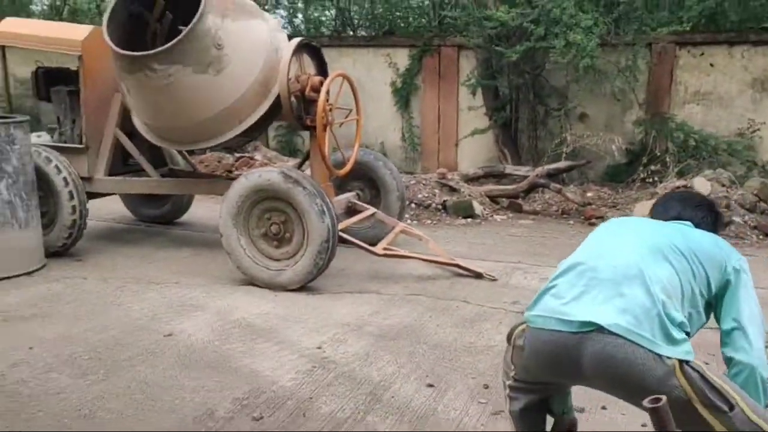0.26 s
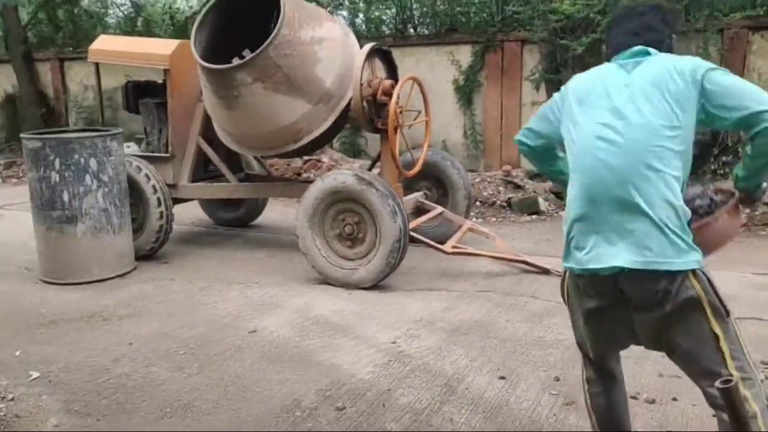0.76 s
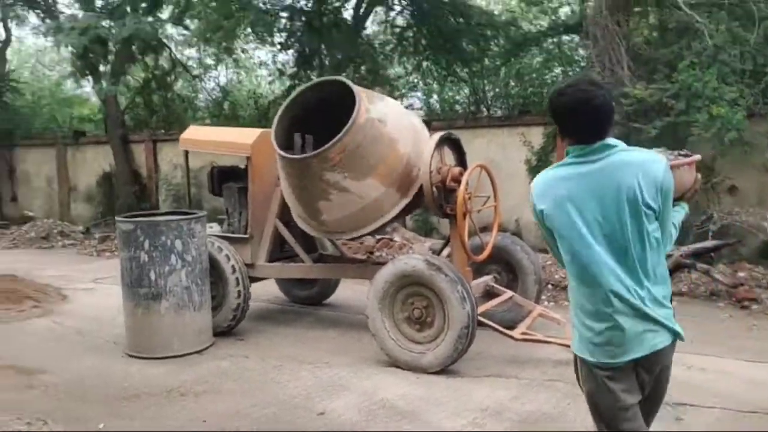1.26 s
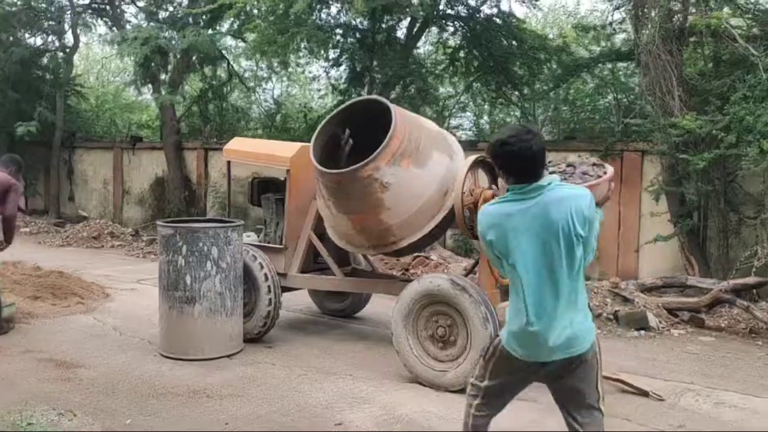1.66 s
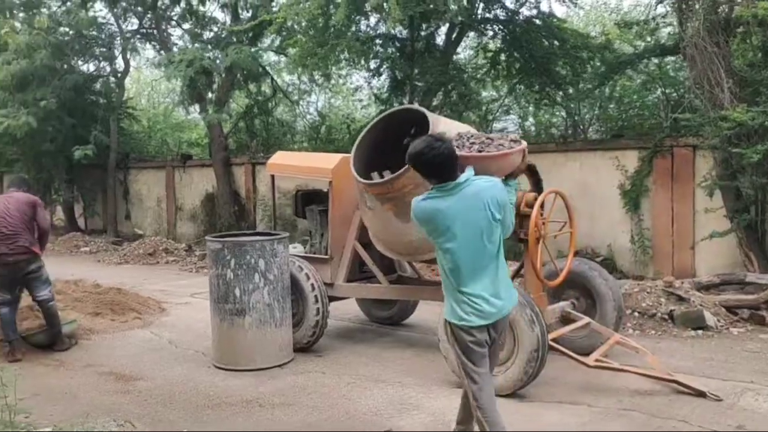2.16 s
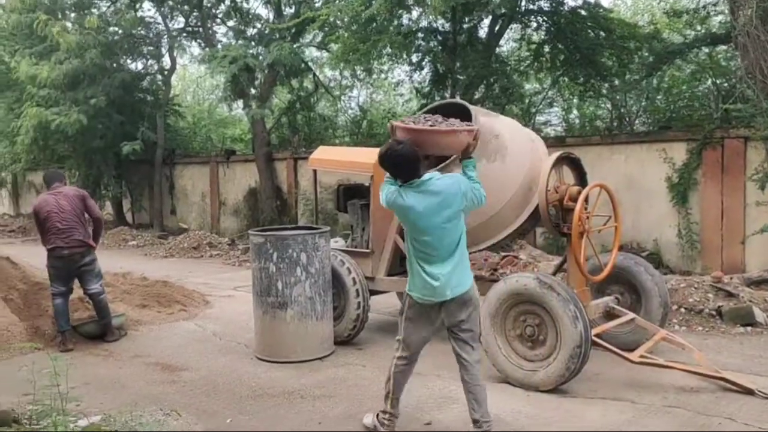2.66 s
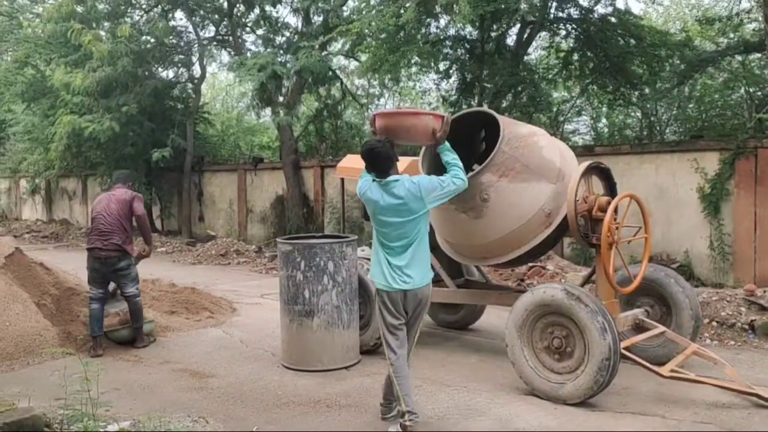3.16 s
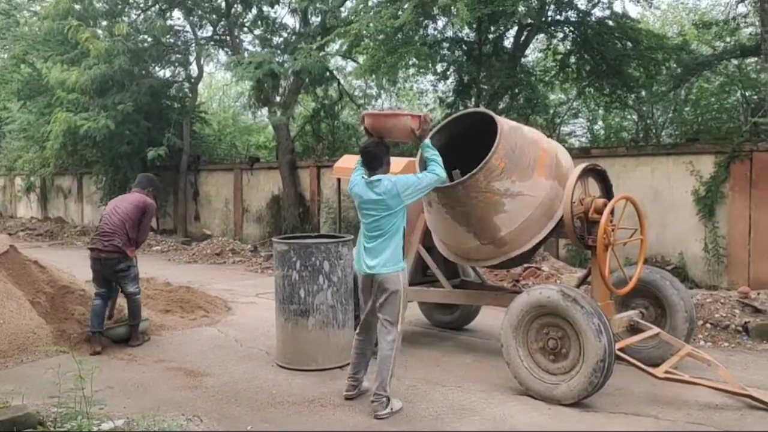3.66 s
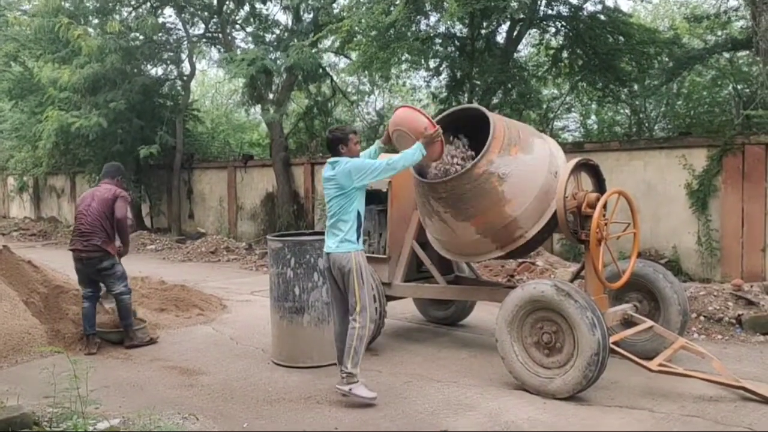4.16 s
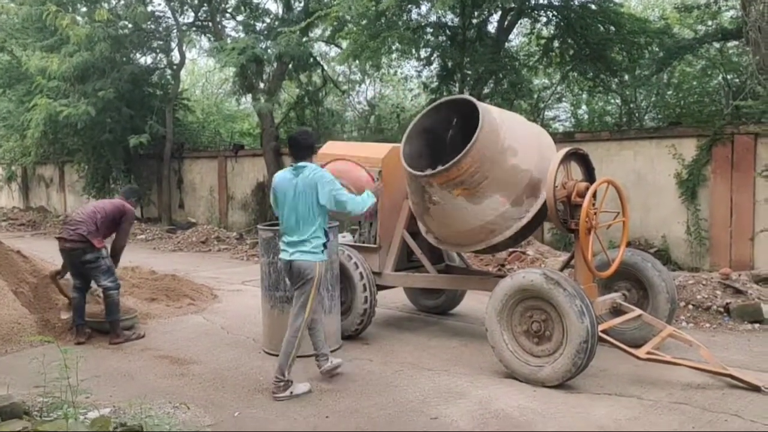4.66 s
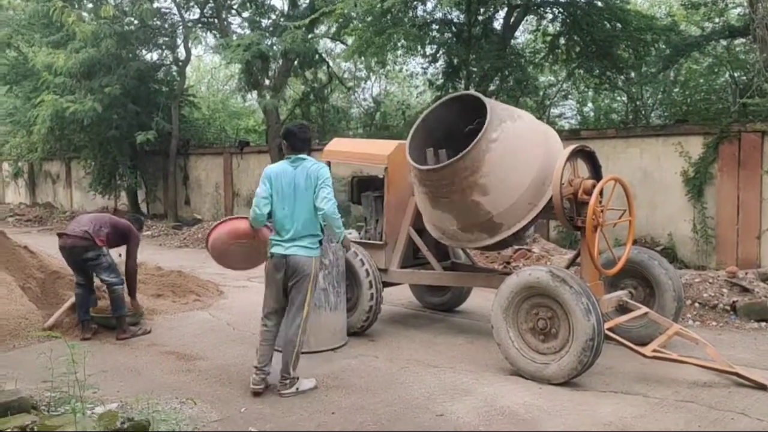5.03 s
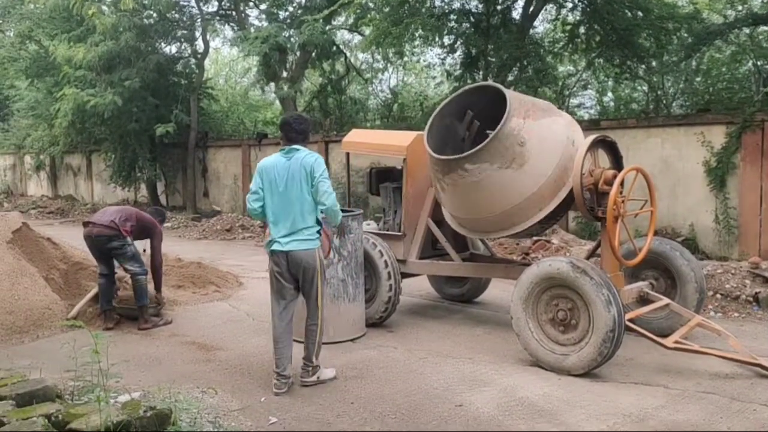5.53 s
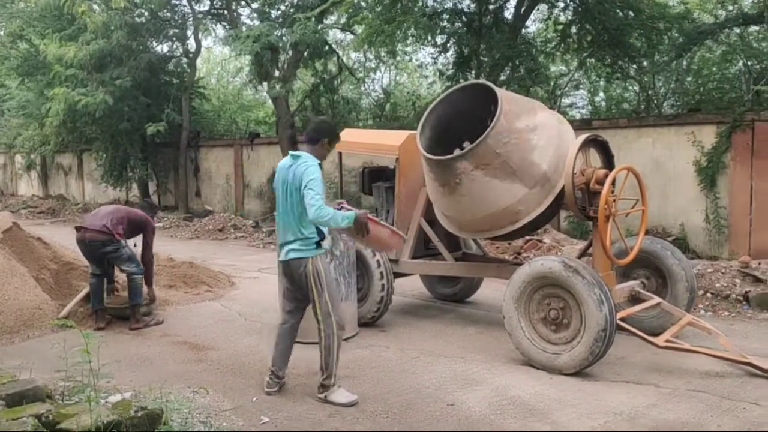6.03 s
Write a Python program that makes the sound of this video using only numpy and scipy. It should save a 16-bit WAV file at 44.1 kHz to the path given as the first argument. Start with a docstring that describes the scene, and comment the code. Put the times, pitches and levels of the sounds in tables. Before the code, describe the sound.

A small diesel thumps steadily while gravel tumbles and scrapes in a metal mixer drum, swelling into a sharp rush as more stones pour in.

```python
"""Stones are heard first, rattling over the beat of a single-cylinder diesel that turns a concrete mixer.
Firings drive silencer and pipe resonances; stones excite mode clusters of the steel shell and tick together.
Falling heaps are bursts of ticks, scrapes are gliding notes, and a tipped pan of gravel swells the rattle.
A walled yard adds diffuse noise. The sound reaches the two ports of a hand-held phone some metres away,
which turns the bass down under loud rattle."""
import sys
import numpy as np
from scipy import signal
from scipy.fft import rfft, irfft, next_fast_len
from scipy.io import wavfile
from scipy.ndimage import uniform_filter1d

SR = 44100
rng = np.random.default_rng(int(sys.argv[2]) if len(sys.argv) > 2 else 0)


def wav_record(signal):
    """Record a signal, one row per channel, as 16-bit PCM in the file named by sys.argv[1]."""
    frames = np.transpose(np.atleast_2d(signal))
    bounded = np.clip(frames, -1, 1)
    # unit amplitude maps onto the largest positive 16-bit level
    quanta = np.round(bounded * 32767).astype(np.int16)
    wavfile.write(sys.argv[1], SR, quanta)


N = 277374

DRUM_LAG, CONE_LAG, ENGINE_LAG = 18, 7, 2  # delay of the left port [samples]


def amp(db):
    """Level definition: decibels to amplitude ratio."""
    return 10 ** (np.asarray(db) / 20)


def unit(x):
    """Normalisation: scale to an rms of 1."""
    return x / np.sqrt(np.mean(x ** 2))


def columns(table):
    """Linear interpolation: every column of a time table at each sample."""
    s, *cols = np.transpose(table)
    time = np.arange(N) / SR
    return [np.interp(time, s, col) for col in cols]


def ring(x, hz, width_hz):
    """Simple resonance: one damped mode of the given bandwidth."""
    return signal.lfilter(*signal.iirpeak(hz, hz / width_hz, fs=SR), x)


def colour(x, points):
    """Spectral filtering: a gain curve through (frequency [Hz], gain [dB]) on a log-frequency axis."""
    size = next_fast_len(N)
    hz, db = np.transpose(points)
    bins_hz = np.fft.rfftfreq(size, 1 / SR)
    gain = amp(np.interp(np.log(bins_hz + 1), np.log(hz), db))
    return irfft(rfft(x, size) * gain, size)[..., :N]


def walk(rate):
    """Band-limited fluctuation: random levels held for 1 / rate seconds, then smoothed twice."""
    hold = int(SR / rate)
    steps = np.repeat(rng.standard_normal(N // hold + 1), hold)
    return uniform_filter1d(uniform_filter1d(steps, hold), hold)[:N]


def waver(rate, share=0.86):
    """Amplitude modulation: a gain that wanders by a few dB."""
    return amp(share * 2.5 * walk(rate))


def drift(hz):
    """Frequency modulation: a centre that wanders by about two per cent."""
    return hz * (1 + 0.019 * walk(8))


def clicks(rate, spread_db):
    """Shot noise: impacts at random moments, with a few hard ones among them."""
    hit = rng.random(N) < rate / SR
    sign = rng.choice([-1, 1], N)
    hardness = rng.exponential(size=N).clip(0, 3.5)
    return unit(hit * sign * amp(spread_db * hardness))


def place(make, lag, direct):
    """Interaural coherence: direct power arrives late at the left port, wall scatter is uncorrelated."""
    direct = np.clip(direct, 0, 1)
    near = make()
    pair = np.array([np.roll(near, lag), near])
    scatter = np.array([make(), make()])
    return np.sqrt(direct) * pair + np.sqrt(1 - direct) * scatter


def facing(hz, centre_hz, octaves, skirt):
    """Modal weighting: most near the centre, a little of every mode, with total power 1."""
    distance = np.log2(np.reshape(hz, (-1, 1)) / centre_hz) / octaves
    share = np.exp(-distance ** 2 / 2) + skirt
    return share / np.sqrt(np.sum(share ** 2, axis=0))


def patch(band, centre_hz, skirt, count, rate):
    """Modal superposition: stone hits excite a cluster of close modes whose gains flicker."""
    lo, hi, t60, octaves = band
    hz = lo * (hi / lo) ** ((np.arange(count) + rng.random(count)) / count)
    flicker = amp(3.7 * np.array([walk(11) for _ in hz]))
    swell = facing(hz, centre_hz, octaves, skirt) * flicker
    width_hz = np.log(1000) / np.pi / t60

    def make():
        """Impulse excitation: a fresh run of hits through the same modes, alternating in sign."""
        hits = clicks(rate, 2.73)
        return unit(sum((-1) ** k * gain * ring(hits, f, width_hz)
                        for k, (f, gain) in enumerate(zip(hz, swell))))
    return make


# Spectrum of the yard's diffuse field: (frequency [Hz], relative gain [dB])
YARD_COLOUR = [(18, -69), (30, -30), (237, 15.5), (691, -2), (1080, 13.5), (1360, 2.5), (2620, 1),
               (3780, -26), (6890, 0.5), (11300, -84), (15500, -54)]


def yard():
    """Diffuse field: steady coloured noise stands for the roar coming back off walls and ground."""
    mid, side = colour(rng.standard_normal((2, N)), YARD_COLOUR)
    # the ports hear the same bass
    side = signal.sosfilt(signal.butter(2, 500, "high", fs=SR, output="sos"), side)
    return amp(-46) * unit(np.array([mid + side, mid - side]))


PIPE_HZ, PIPE_WIDTH_HZ, PIPE_SCATTER = 342, 25.3, 0.0119  # scatter is a share of the frequency


def exhaust(firing):
    """Pipe resonance: each puff swells and fades at a wandering pitch, with gas noise around it."""
    pole = np.exp(-np.pi * PIPE_WIDTH_HZ / SR)
    envelope = unit(firing) + .4 * (rng.standard_normal(N) + 1j * rng.standard_normal(N))
    for _ in range(3):
        envelope = signal.lfilter([1], [1, -pole], envelope)
    pitch_hz = PIPE_HZ * (1 + PIPE_SCATTER * walk(9))
    note = unit(np.real(envelope * np.exp(2j * np.pi * np.cumsum(pitch_hz) / SR)))
    gas_noise = ring(ring(rng.standard_normal(N), 361, 97), 361, 97)
    roar = (.4 + unit(np.abs(envelope))) * gas_noise
    return note + amp(-9) * unit(roar)


FIRE_HZ, FIRST_FIRE_S = 9.427, .002
# lowest [Hz], highest [Hz], t60 [s], breadth of the sounding part [octaves]
CLATTER = (390, 740, .08, .3)
# Mean levels of the engine's parts before they waver: (time [s], silencer thump [dB], pipe ring [dB],
# frame throb [dB], clatter [dB], clatter centre [Hz])
ENGINE_LEVELS = [(0.0, -29.5, -49, -69, -35, 543), (0.07, -47.5, -50, -54, -46, 542),
                 (0.23, -41.5, -35, -71, -44.5, 416), (0.4, -43.5, -52, -55, -41.5, 436),
                 (0.59, -36, -49.5, -69, -39.5, 470), (0.81, -51, -50.5, -69, -50, 450),
                 (0.84, -36.5, -40.5, -63, -44.5, 500), (1.07, -45.5, -50.5, -68, -42, 645),
                 (1.21, -34, -46, -61, -42, 756), (1.94, -44.5, -38.5, -62, -43.5, 483),
                 (2.07, -52, -61, -65, -51, 586), (2.12, -46.5, -43, -77, -48.5, 421),
                 (2.33, -43.5, -47, -59, -39.5, 584), (2.43, -44, -33.5, -63, -39, 446),
                 (2.64, -40.5, -41, -62, -45, 433), (2.95, -44.5, -39.5, -64, -51, 416),
                 (3.1, -46.5, -46, -61, -47, 420), (3.27, -41.5, -35, -60, -49, 407),
                 (3.4, -51, -42, -66, -58, 402), (3.55, -49, -48, -69, -49, 500),
                 (3.64, -38, -39, -65, -38.5, 423), (3.82, -41, -32, -56, -45, 422),
                 (3.93, -37.5, -38, -61, -43.5, 415), (4.12, -37, -40.5, -60, -38, 407),
                 (4.15, -46, -32.5, -71, -43, 410), (4.34, -54, -57, -65, -56, 620),
                 (4.48, -52, -52, -73, -63, 450), (4.8, -45.5, -41.5, -62, -45.5, 423),
                 (4.9, -37, -34.5, -55, -45, 407), (5.01, -32.5, -34, -51, -42.5, 407),
                 (5.09, -37, -41.5, -57, -39, 465), (5.25, -36.5, -37.5, -53, -44.5, 417),
                 (5.5, -45, -37, -52, -47.5, 365), (5.88, -42, -41.5, -62, -50.5, 390),
                 (6.22, -39, -48.5, -59, -40, 513), (6.29, -32, -28, -54, -44, 437)]
# Silencer chambers, ringing in turn: (frequency [Hz], width of the first pass [Hz], relative level [dB],
# delay [s])
SILENCER_MODES = [(166, 20, -3.5, 0.01023), (179.1, 11.6, 5.5, .045), (213.1, 13.3, 0.5, 0.081),
                  (243.2, 18.3, -2, 0.00097), (267.3, 19.7, 0, .03), (297.3, 30, 0, 0.032)]
# Frame resonances: (frequency [Hz], width of each of two passes [Hz], relative level [dB])
FRAME_MODES = [(105, 75, -0.5), (151, 41, 1.5)]
# Where the silencer sounds most, before drift: (time [s], centre frequency [Hz])
THUMP_CENTRE = [(0, 197), (1.5, 248.5), (3, 264), (4.8, 253), (5.2, 219), (6.29, 250)]


def engine():
    """Periodic excitation: firings, with weaker compression strokes between, drive damped resonators."""
    thump_db, pipe_db, frame_db, clatter_db, clatter_hz = columns(ENGINE_LEVELS)
    thump_hz = drift(columns(THUMP_CENTRE)[0])
    turns = np.arange(int(2 * FIRE_HZ * N / SR))
    chance = rng.standard_normal((len(turns), 2))
    jitter_s = 0.00046 * chance[:, 0].clip(-2, 2)
    at = ((FIRST_FIRE_S + turns / (2 * FIRE_HZ) + jitter_s) * SR).astype(int).clip(0)
    firing, strokes = np.zeros(N), np.zeros(N)
    firing[at[::2]] = amp(1.5 * chance[::2, 1])
    strokes[at] = amp(0.78 * chance[:, 1] - 8.1 * (turns % 2))
    gas = unit(strokes) + .7 * rng.standard_normal(N)  # turbulent flow blurs the lines

    frame = sum(amp(db) * ring(ring(gas, f, w), f, w) for f, w, db in FRAME_MODES)
    shares = facing([f for f, *_ in SILENCER_MODES], thump_hz, 0.17, 0.24)
    thump = np.zeros(N)
    for k, (f, w, db, late) in enumerate(SILENCER_MODES):
        chamber = ring(ring(np.roll(gas, int(late * SR)), f, w), f, 1.8 * w)
        thump += (-1) ** k * amp(db) * shares[k] * chamber
    pipe = exhaust(np.roll(firing, -int(0.011 * SR)))

    mono = unit(frame) * amp(frame_db) * waver(16)
    mono += unit(thump) * amp(thump_db) * waver(14)
    mono += unit(pipe) * amp(pipe_db) * waver(11)
    clatter = place(patch(CLATTER, clatter_hz, 0.82, count=14, rate=500), ENGINE_LAG, 0.65)
    clatter = clatter * amp(clatter_db) * waver(10)
    echo = amp(-18.5) * np.roll(mono, int(0.056 * SR))  # off a side wall, in opposite phase at the ports
    return np.array([np.roll(mono, ENGINE_LAG) + echo, mono - echo]) + clatter


# Dull knocks on the frame: (time [s], level before the envelope [dB], fade time constant [s])
FRAME_KNOCKS = [(1.071, -27.5, 0.036), (1.098, -26, 0.019), (2.32, -31.5, 0.028), (3.599, -28, 0.018),
                (5.129, -34, 0.032)]


def knocks():
    """Damped impact: short dull blows with a broad spectrum and exponential decay."""
    shape = np.zeros(N)
    t = np.arange(SR // 8) / SR
    for s, db, fade in FRAME_KNOCKS:
        start = int(s * SR)
        shape[start:start + len(t)] += amp(db) * (1 - np.exp(-t / 0.0024)) * np.exp(-t / fade)
    body_colour = [(150, -27), (300, 10.5), (600, 11.5), (1300, 13.0), (2500, -52)]
    body = lambda: unit(colour(clicks(2200, 0.93), body_colour))
    return shape * place(body, ENGINE_LAG, 0.86)


# Mode clusters: lowest [Hz], highest [Hz], t60 [s], breadth of the sounding part [octaves]
BELLY, CONE = (720, 940, .1, .1), (960, 1290, .11, .06)
RIM, BLADES = (1470, 2050, .065, .12), (2080, 3400, .06, .12)
SHELL_WAVER = 0.69
# Shell regions that stones roll on, mean levels before they waver: (time [s], belly [dB], cone [dB],
# cone centre [Hz], rim [dB], rim centre [Hz], blades [dB], blades centre [Hz])
SHELL_LEVELS = [(0.0, -68, -35.5, 1060, -56, 1820, -50, 2630),
                (0.12, -46, -43, 1026, -50, 1550, -39.5, 2380),
                (0.19, -45, -34.5, 1110, -55, 1800, -37.5, 2410),
                (0.37, -48, -39, 1024, -47, 1680, -43, 2650), (0.46, -54, -34, 996, -53, 1940, -43, 2500),
                (0.56, -43.5, -47, 1100, -46, 1840, -50.5, 2620),
                (0.73, -54.5, -34.5, 1090, -45, 1800, -37, 2570),
                (0.88, -37.5, -34, 1090, -41, 1670, -40.5, 3000),
                (0.95, -45.5, -31.5, 1110, -42, 1720, -39, 2850),
                (1.14, -38.5, -37.5, 1110, -34.5, 1700, -38.5, 2720),
                (1.26, -41, -36.5, 1060, -40, 1620, -37.5, 2880),
                (1.35, -39, -32.5, 1030, -43, 1640, -46, 2800),
                (1.38, -38, -33, 1060, -38.5, 1960, -42, 2760),
                (1.47, -33, -35, 1010, -35, 1970, -34, 2760),
                (1.54, -35.5, -37.5, 1110, -37, 1520, -36.5, 2790),
                (1.61, -42, -35, 990, -36, 1690, -34.5, 3000),
                (1.7, -42, -34, 1070, -32.5, 1610, -37, 2740),
                (1.75, -40.5, -42, 1150, -39, 1860, -33.5, 2620),
                (1.87, -44, -34, 1080, -38.5, 1590, -35.5, 2800),
                (1.98, -51, -31, 1070, -45, 1860, -40.5, 2730),
                (2.01, -49.5, -42, 1110, -39, 1860, -29, 2620),
                (2.17, -41, -44, 1030, -40.5, 1950, -37.5, 2800),
                (2.31, -38, -35.5, 1080, -40, 2000, -36.5, 2080),
                (2.38, -45, -43, 1160, -35.5, 1950, -34, 2000),
                (2.5, -39.5, -44, 1010, -40, 1910, -40.5, 2130),
                (2.57, -41, -44, 1160, -37, 1790, -41, 2920),
                (2.64, -41.5, -34.5, 1016, -36, 1660, -36.5, 2400),
                (3.19, -42.5, -38, 1036, -50.5, 1860, -39.5, 2190),
                (3.43, -49, -33.5, 1146, -25.5, 1770, -29.5, 2400),
                (3.47, -46, -30, 1070, -32, 1890, -32, 2150),
                (3.54, -44, -36, 1100, -31.5, 1880, -38.5, 2750),
                (3.68, -34, -31.5, 1100, -31.5, 1930, -36, 2160),
                (3.75, -47, -34, 1110, -26, 1760, -41, 2330),
                (3.82, -54, -33, 1124, -35.5, 1810, -43, 2900),
                (3.92, -35, -36.5, 1140, -36, 1750, -34.5, 2710),
                (4.06, -42, -48, 1000, -38.5, 1800, -34, 2335), (4.1, -36, -43, 1070, -29, 1740, -41, 2620),
                (4.13, -47, -35, 1090, -32, 1730, -32.5, 2480),
                (4.22, -33, -34.5, 1110, -28.5, 1800, -31.5, 2420),
                (4.31, -34.5, -65, 1020, -33.5, 1730, -37, 2680),
                (4.34, -43, -28, 1046, -34, 1780, -34, 2720), (4.4, -54, -32, 1110, -29.5, 1830, -27, 2510),
                (4.57, -49.5, -58, 1110, -37, 1730, -42, 2480),
                (4.64, -43, -42, 1210, -46, 1870, -42, 2390),
                (4.68, -45.5, -49, 1100, -43.5, 1930, -41, 2740),
                (4.84, -42.5, -41.5, 1080, -39, 1700, -43, 2510),
                (4.99, -37.5, -36.5, 1130, -38, 2020, -36.5, 2680),
                (5.04, -43, -47, 1060, -41, 1850, -40.5, 2700),
                (5.11, -35.5, -34, 1144, -34.5, 1920, -33, 2600),
                (5.36, -43, -33.5, 1085, -34.5, 1710, -36, 2370),
                (5.46, -42, -35.5, 1180, -34, 1910, -29.5, 2330),
                (5.53, -46, -33, 1060, -36, 1870, -37.5, 2160),
                (5.59, -44, -47, 1060, -40, 1810, -32.5, 2230),
                (5.78, -48.5, -37, 1120, -37.5, 1850, -37, 2470),
                (6.15, -42, -37, 1054, -37.5, 1680, -38.5, 2400),
                (6.29, -38, -38, 1140, -38, 1680, -39, 2730)]


def drum():
    """Shell vibration: rolling stones excite four regions of the steel, each a cluster of modes."""
    belly_db, cone_db, cone_hz, rim_db, rim_hz, blades_db, blades_hz = columns(SHELL_LEVELS)
    belly = place(patch(BELLY, drift(842), 0.16, count=8, rate=900), ENGINE_LAG, 0.75)
    cone = place(patch(CONE, cone_hz, 0.33, count=14, rate=1300), CONE_LAG, 1.0)
    rim = place(patch(RIM, rim_hz, 0.89, count=14, rate=900), DRUM_LAG, 0.15)
    blades = place(patch(BLADES, blades_hz, 0.46, count=20, rate=700), DRUM_LAG, 0.74)
    return (belly * amp(belly_db) * waver(20, SHELL_WAVER)
            + cone * amp(cone_db) * waver(16, SHELL_WAVER)
            + rim * amp(rim_db) * waver(16, SHELL_WAVER)
            + blades * amp(blades_db) * waver(16, SHELL_WAVER))


# Stones dragging along the shell: (time [s], length [s], start pitch [Hz], end pitch [Hz],
# amplitude before roughness [dB])
DRAGS = [(.075, .055, 2330, 2260, -37), (.113, .04, 2560, 2470, -46), (.13, 0.035, 2385, 2280, -34),
         (.178, .035, 2250, 2380, -37), (.222, 0.043, 2480, 2520, -36.5), (.28, 0.091, 2480, 2630, -45),
         (.41, 0.039, 2550, 2610, -37.5), (.17, 0.16, 1120, 1097, -38), (.68, 0.11, 2600, 2470, -45),
         (.7, 0.096, 1132, 1080, -40), (.84, 0.18, 1084, 1127, -39), (1.521, 0.18, 1020, 1054, -37.5),
         (1.84, 0.136, 1090, 1054, -39.5), (1.215, 0.12, 2690, 2810, -38), (1.75, 0.039, 2510, 2480, -34),
         (2.02, 0.04, 2430, 2430, -29), (2.619, 0.12, 1050, 1070, -40), (2.759, 0.116, 1067, 1053, -40.5),
         (3.23, .05, 1050, 1050, -31), (3.3, .06, 1050, 1080, -31), (3.42, .13, 1075, 1090, -29.5),
         (3.62, .1, 2150, 2130, -34), (3.69, .1, 1780, 1700, -36), (3.41, .04, 2720, 2700, -33),
         (3.76, 0.054, 1950, 1990, -37), (3.77, .15, 1160, 1130, -38), (3.525, 0.12, 2750, 2850, -38),
         (3.72, .18, 2800, 2865, -40.5), (1.0, .13, 3550, 3620, -43), (1.37, .11, 1993, 2040, -40),
         (4.26, 0.068, 799, 870, -38.5), (4.34, .11, 980, 1123, -38), (4.93, .12, 2596, 2640, -41),
         (5.08, 0.14, 2605, 2556, -40), (5.44, 0.072, 2200, 2176, -34)]


def scrapes():
    """Friction-driven vibration: each drag is a narrow gliding note, roughened in amplitude and phase."""
    out = np.zeros((2, N))
    rough = unit(signal.lfilter(*signal.butter(2, 44, fs=SR), clicks(700, 2.6)))  # below about 44 Hz
    for s, length, from_hz, to_hz, db in DRAGS:
        t = np.arange(int(length * SR)) / SR
        span = slice(int(s * SR), int(s * SR) + len(t))
        edge = np.clip(np.minimum(t, length - t) / 0.011, 0, 1)
        phase = 2 * np.pi * (from_hz + (to_hz - from_hz) * t / length / 2) * t
        note = amp(db) * edge * (1 + .5 * rough[span]) * np.sin(phase + .6 * rough[span])
        lag = CONE_LAG if from_hz < CONE[1] else DRUM_LAG
        out[0, span.start + lag:span.stop + lag] += note
        out[1, span] += note
    return out


TIPPED_S, POUR_PEAK_S, POUR_ENDS_S, POUR_EDGE_S = 4.11, 4.373, 4.57, 0.01
POUR_START_DB, POUR_PEAK_DB = 5.5, 13.5  # added to the rattle levels
# Stone on stone as the load churns, before pour and flutter: (time [s], fine rattle [dB],
# coarse rattle [dB])
CHURN_LEVELS = [(0, -35.5, -42), (.09, -34, -42.5), (.16, -40.5, -46), (.26, -46.5, -45), (.29, -40, -39),
                (.35, -41, -38), (.41, -44, -40.5), (.49, -47, -50), (.55, -43, -41), (.63, -41, -37),
                (.72, -36.5, -29), (.85, -39.5, -37.5), (.98, -43.5, -38), (1.25, -41, -40),
                (1.35, -39, -40.5), (1.45, -45.5, -38), (1.6, -38.5, -36.5), (1.72, -40.5, -37.5),
                (1.83, -44.5, -36), (1.94, -41.5, -37.5), (2.02, -32, -34.5), (2.12, -36.5, -36.5),
                (2.26, -43, -42.5), (2.5, -46, -45.5), (2.6, -43, -41.5), (2.94, -44.5, -46),
                (3.05, -41, -43.5), (3.16, -42, -43), (3.28, -38.5, -42), (3.38, -45, -33),
                (3.55, -44.5, -43), (3.8, -44.5, -45.5), (4.08, -41.5, -38.5), (4.27, -41.5, -42),
                (4.32, -40.5, -42), (4.45, -40, -41), (4.52, -39, -35), (4.6, -38.5, -42),
                (4.652, -39.5, -44), (4.666, -30.5, -34), (4.71, -32, -35), (4.8, -37, -38.5),
                (4.95, -37, -40), (5.1, -37.5, -37), (5.3, -35.5, -38), (5.55, -38, -37), (5.75, -36, -37),
                (5.84, -36, -31.5), (5.95, -35, -35), (6.08, -37, -38.5), (6.29, -40, -42)]


def churn():
    """Level superposition: the tipped pan adds a rush that starts at once, swells and stops."""
    pour = columns([(TIPPED_S - POUR_EDGE_S, 0), (TIPPED_S, POUR_START_DB), (POUR_PEAK_S, POUR_PEAK_DB),
                    (POUR_ENDS_S, POUR_START_DB), (POUR_ENDS_S + 2 * POUR_EDGE_S, 0)])[0]
    return [db + pour for db in columns(CHURN_LEVELS)]


def clumps():
    """Clustered arrivals: a gain that jumps at random moments and falls back exponentially."""
    kicks = (rng.random(N) < 90 / SR) * amp(2.2 * rng.exponential(size=N).clip(0, 3))  # 90 a second
    falling_back = signal.lfilter([1], [1, -np.exp(-1 / (.005 * SR))], kicks)
    return unit(2.22 + falling_back)


# Heaps of stones dropping off the blades or out of the pan: (time [s], strike level before envelope and
# common offset [dB], pitch of the loudest stones [Hz], shell level relative to the strike [dB])
HEAPS = [(0.0194, -34, 6900, -20), (0.0528, -22, 7190, -23), (0.08, -18, 7100, -19),
         (0.1144, -24, 6440, -17), (0.2723, -23, 6660, -9), (0.514, -30, 5930, 0),
         (0.5425, -22.5, 6160, -19), (0.6225, -23, 3100, -8), (0.6908, -19, 3260, -12),
         (0.764, -16.5, 3130, -7), (0.8024, -22, 6800, -18), (0.859, -22, 3150, -20),
         (0.999, -20.5, 6660, -25), (1.2211, -22, 3580, -5), (1.2554, -18.5, 3780, -16),
         (1.8074, -20.5, 3080, -25), (1.8322, -18.5, 6390, -26), (1.875, -21, 6320, -20),
         (1.9866, -15.5, 3150, -14), (2.0094, -14.5, 7030, -2.5), (2.057, -17, 6440, -7),
         (2.539, -21, 6660, -2.5), (2.7643, -21.5, 6360, -4), (2.98, -21, 6320, -13),
         (2.9934, -21.5, 6620, -8), (3.086, -18, 3770, -11), (3.187, -22.5, 5950, -15),
         (3.219, -21.5, 4070, -18), (3.271, -23, 4500, -10), (3.298, -18, 6400, -8), (3.343, -14, 4170, -9),
         (3.3844, -21, 6500, -19), (3.425, -18, 6640, -5), (3.6152, -25, 6300, 4), (3.828, -23, 3160, -20),
         (3.932, -19.5, 3240, -5), (4.039, -21, 5000, -3), (4.116, -24, 3760, 2), (4.144, -13.5, 5800, -15),
         (4.1704, -14, 6450, -3), (4.222, -19, 5500, -6), (4.3031, -20, 6600, -2.5),
         (4.3396, -10.5, 6800, -5.5), (4.368, -12, 6500, -15), (4.3984, -11, 6680, -15),
         (4.431, -19, 6600, -13), (4.466, -9, 6800, -10.5), (4.5424, -18, 4180, -10),
         (4.5685, -16.5, 4080, -11), (4.662, -10, 6400, -16), (4.7516, -25, 6540, -13),
         (4.805, -21, 6600, -12), (4.8893, -26, 6690, -12), (4.994, -20.5, 5860, -2),
         (5.023, -22, 6530, -18), (5.1622, -20, 5850, -5), (5.2086, -16, 6400, -5), (5.2754, -23, 6470, -3),
         (5.42, -18.5, 6560, 0), (5.5273, -21, 6720, -16), (5.599, -21, 5900, 2.5), (5.696, -16, 6700, -3),
         (5.7937, -16, 6840, -6), (5.813, -18.5, 6500, -10), (5.837, -11.5, 6900, -13),
         (5.8865, -16, 6600, -22), (5.9114, -25, 3980, -6), (5.9812, -16.5, 6700, -3),
         (6.1539, -23, 6600, 1), (6.1998, -26.5, 6660, -5)]


def spills():
    """Exponential relaxation: each heap throws up grit in proportion to its strike, which then settles."""
    kicks = np.zeros(N)
    for s, db, *_ in HEAPS:
        kicks[int(s * SR)] = amp(db)
    settling = signal.lfilter([1], [1, -np.exp(-1 / (0.02 * SR))], kicks)
    return uniform_filter1d(settling, int(0.018 * SR))


# lowest [Hz], highest [Hz], t60 [s], breadth of the sounding part [octaves]
COARSE, FINE = (3100, 5900, .032, .16), (5500, 8400, .02, .1)
# Where the rattle is loudest; the coarse centre also drifts: (time [s], coarse centre [Hz],
# fine centre [Hz])
RATTLE_CENTRES = [(0.0, 3870, 6720), (1.0, 3500, 6700), (1.01, 3660, 6650), (1.84, 3300, 6460),
                  (2.1, 4370, 6540), (2.5, 4600, 6660), (2.64, 3280, 6200), (2.71, 4120, 6300),
                  (3.68, 4230, 6400), (3.75, 3080, 6460), (3.89, 4400, 6540), (4.27, 4830, 6480),
                  (4.61, 3970, 6700), (4.64, 4660, 6520), (5.34, 5000, 6440), (5.41, 4050, 6500),
                  (6.25, 4160, 6530), (6.29, 4620, 6300)]
# Spectrum of the grit: (frequency [Hz], relative gain [dB])
GRIT_SPECTRUM = [(4710, -29), (8000, -2), (9090, -5.5), (9950, -9), (11200, -22), (14000, -11.5),
                 (15500, -19)]
# Slow change of the grit, before it follows the fine rattle: (time [s], level [dB])
GRIT_LEVEL = [(0, -62), (.55, -49), (.9, -63.5), (1.3, -68), (1.9, -65), (2.2, -65), (2.7, -51), (3.1, -59),
              (3.5, -63), (4.05, -57), (4.2, -53.5), (4.5, -57), (4.62, -58), (4.8, -65), (5.2, -56.5),
              (6.29, -54)]


def gravel():
    """Granular collision noise: dense dry ticks of stone on stone, uneven and in bunches."""
    fine_db, coarse_db = churn()
    # grit swings 1.67 times as far as the fine rattle does about -39.5 dB
    grit_db = columns(GRIT_LEVEL)[0] + 1.67 * (fine_db + 39.5)
    coarse_hz, fine_hz = columns(RATTLE_CENTRES)
    coarse = place(patch(COARSE, drift(coarse_hz), 0.84, count=22, rate=1200), DRUM_LAG, 0.14)
    fine = place(patch(FINE, fine_hz, 0.19, count=20, rate=2400), DRUM_LAG, 0.1)
    grit = place(lambda: unit(colour(clicks(9000, 1.4), GRIT_SPECTRUM)), DRUM_LAG, 0.058)
    bunches = clumps()
    return (coarse * bunches * amp(coarse_db + 1.8 * walk(40))
            + fine * bunches * amp(fine_db + 3.2 * walk(40))
            + grit * (amp(grit_db) * waver(30) + amp(-53) * spills()))


# Spectrum of falling stones: (frequency [Hz], relative gain [dB])
STONE_SPECTRUM = [(1650, -21), (2800, 6), (3500, 5), (3980, 2), (5900, 8.5), (6710, 7.5), (8250, -7),
                  (9940, -42), (11200, -82.5), (14000, -40), (15500, -39)]


def falls():
    """Impact burst: each heap is a decaying burst of ticks at its own pitch that also strikes the shell."""
    stones = place(lambda: unit(colour(clicks(4000, 2.4), STONE_SPECTRUM)), DRUM_LAG, .4)
    struck = lambda: unit(ring(clicks(2000, 0.92), 2160, 470) + 0.16 * ring(clicks(1800, 1.5), 1000, 250))
    shell = place(struck, DRUM_LAG, 0.66)
    out = np.zeros((2, N))
    for s, db, hz, shell_db in HEAPS:
        span = slice(int(s * SR), int(s * SR) + SR // 6)
        t = np.arange(out[0, span].size) / SR
        shape = (1 - np.exp(-t / 0.002)) * np.exp(-t / 0.017)
        crack = amp(-3) * np.exp(-t / 0.00062)
        pitched = unit(ring(stones[:, span], hz, 0.057 * hz))
        ticks = unit(1.25 * stones[:, span] + pitched)
        out[:, span] += amp(db) * ((shape + crack) * ticks + amp(shell_db) * shape * shell[:, span])
    return amp(-7.5) * out  # common offset


# The phone swings round, which shifts the balance of the stones: (time [s], left minus right [dB])
SWING_BALANCE = [(0.0, 2), (0.54, 2), (1.07, -0.5), (1.65, 0), (2.77, -1.5), (3.85, -1), (4.12, -1),
                 (6.29, -1.5)]


def scene():
    """Linear superposition: all sources add, the stones under a slowly changing left-right balance."""
    swing = amp(columns(SWING_BALANCE)[0] * np.array([[.5], [-.5]]))
    stones = drum() + scrapes() + gravel() + falls()
    return yard() + engine() + knocks() + swing * stones


DUCK_FROM_DB, DUCK_SLOPE, DUCK_S = -27, 0.62, 0.034  # slope: dB of bass lost per dB of treble far above
BASS_HZ, TREBLE_HZ = 725, 3220


def duck(pair):
    """Dynamic compression: treble power, averaged about each moment, turns the bass down past a soft knee."""
    bass = signal.sosfiltfilt(signal.butter(2, BASS_HZ, fs=SR, output="sos"), pair)
    treble = signal.sosfilt(signal.butter(2, TREBLE_HZ, "high", fs=SR, output="sos"), pair)
    power = uniform_filter1d(np.mean(treble ** 2, axis=0), int(DUCK_S * SR))
    excess = power / amp(DUCK_FROM_DB) ** 2
    return pair - bass + bass * (1 + excess ** 2) ** (-DUCK_SLOPE / 4)


def record(dry):
    """Receiver response: the left port is coloured and dull at the top; both lose all above 15.5 kHz."""
    left = colour(dry[0], [(150, 2.0), (600, -1.0), (1100, 2.0), (7000, 2.0), (9500, 3.5), (12500, -8.0)])
    ducked = duck(np.array([left, dry[1]]))
    return signal.sosfilt(signal.ellip(10, .2, 80, 15520, fs=SR, output="sos"), ducked)


dry = scene()
out = record(dry)
wav_record(out)
```